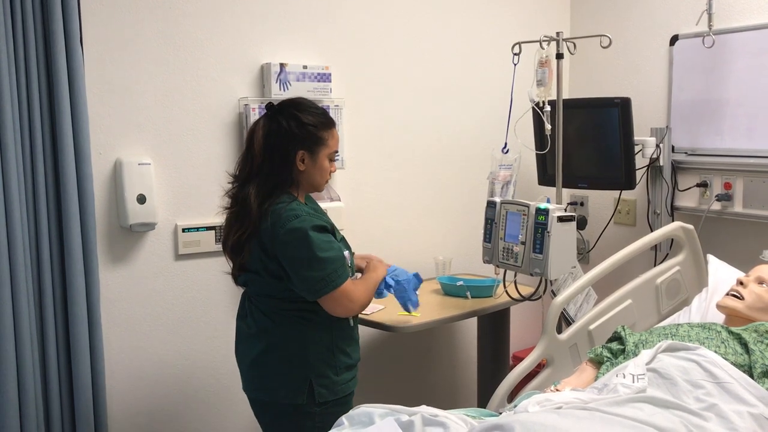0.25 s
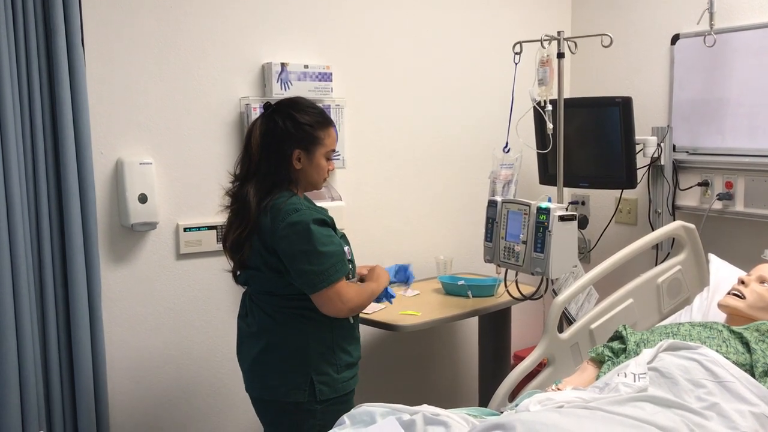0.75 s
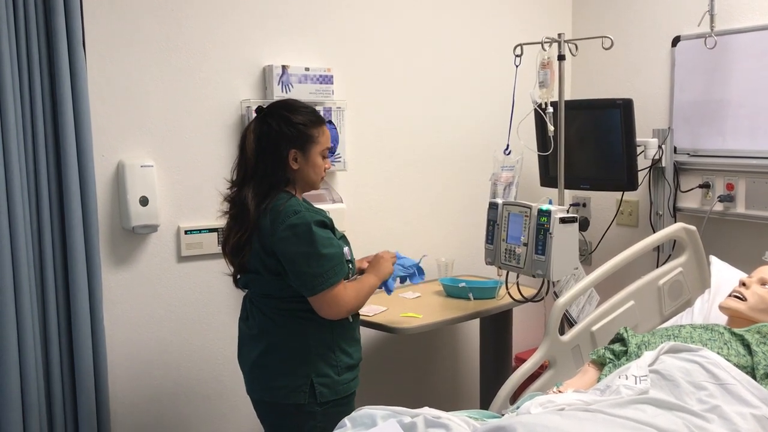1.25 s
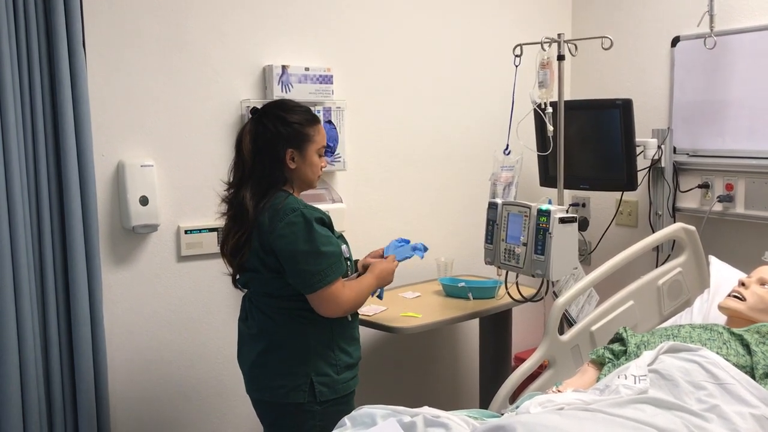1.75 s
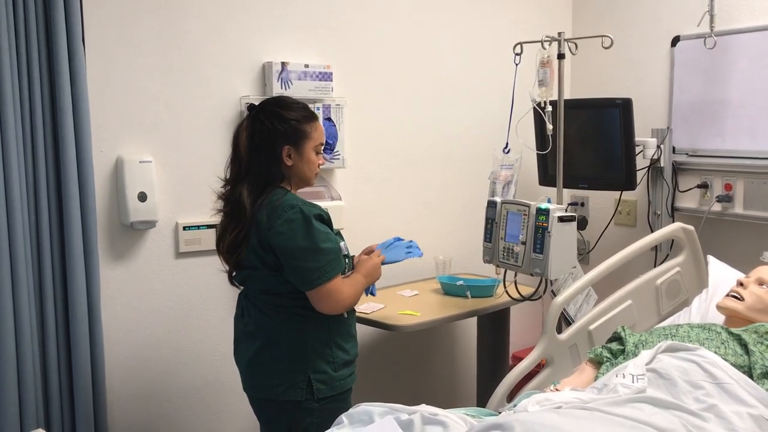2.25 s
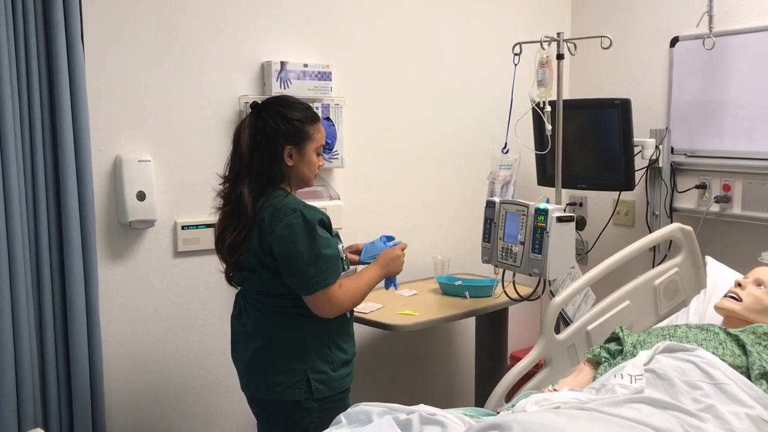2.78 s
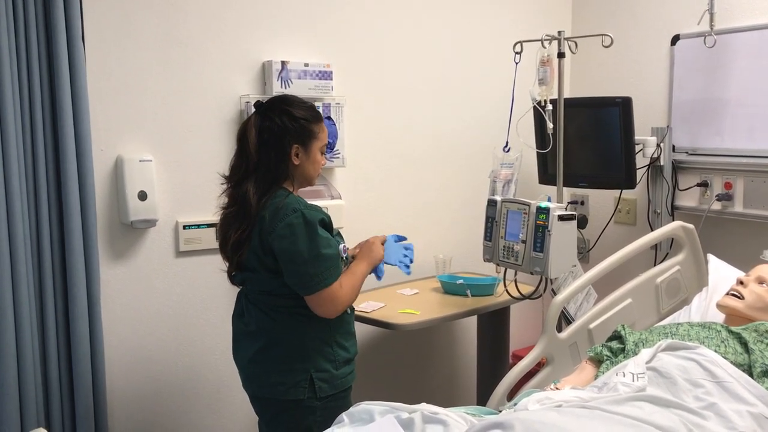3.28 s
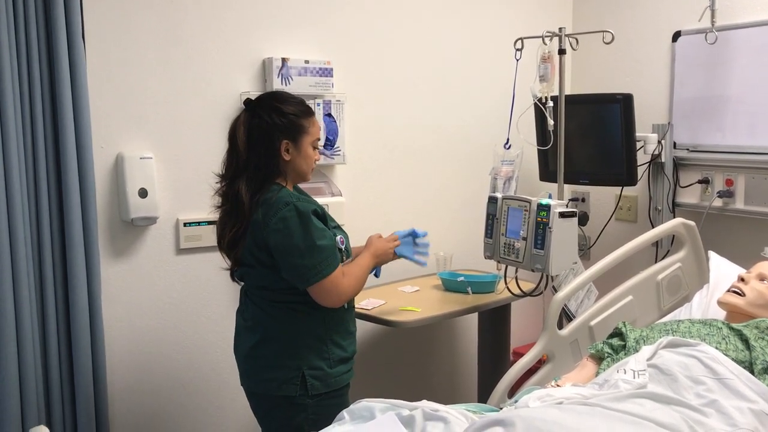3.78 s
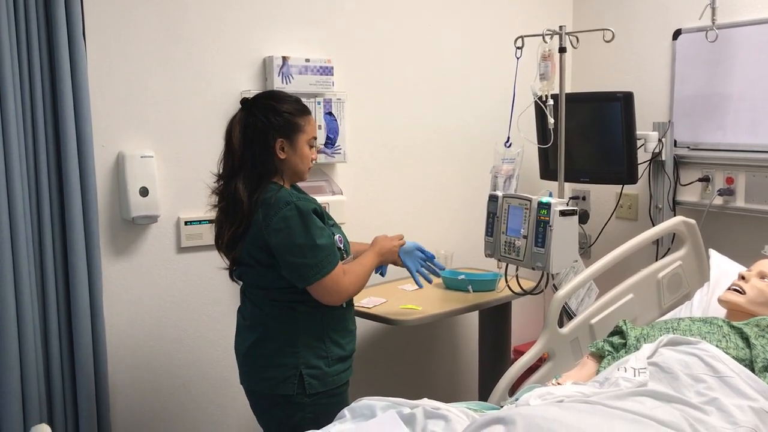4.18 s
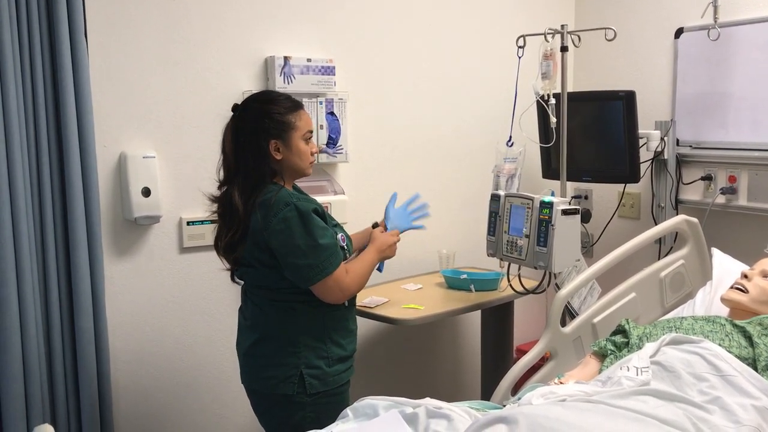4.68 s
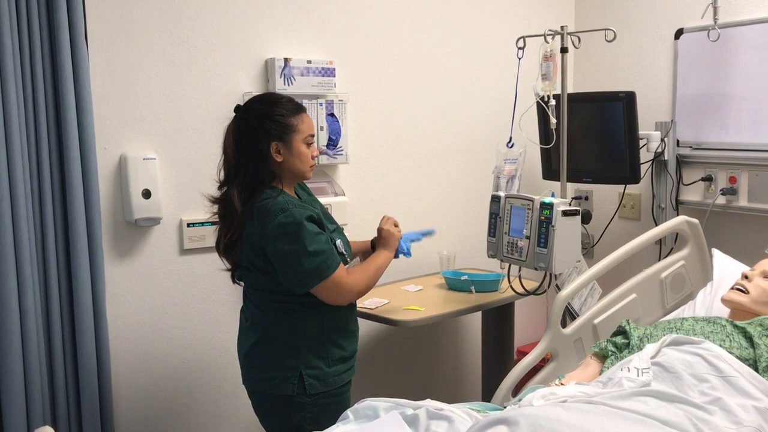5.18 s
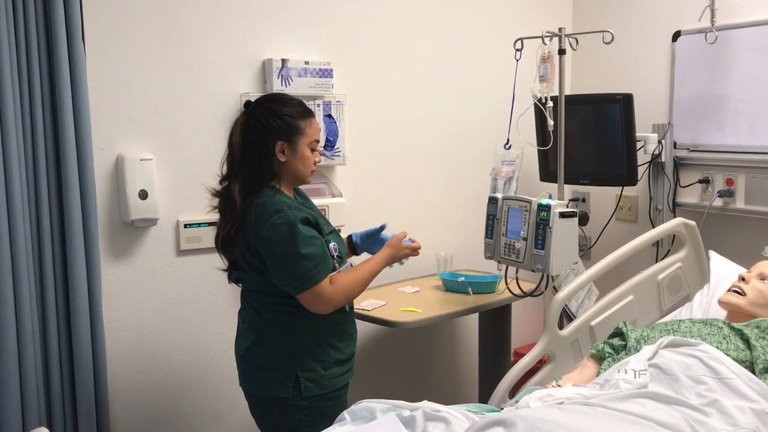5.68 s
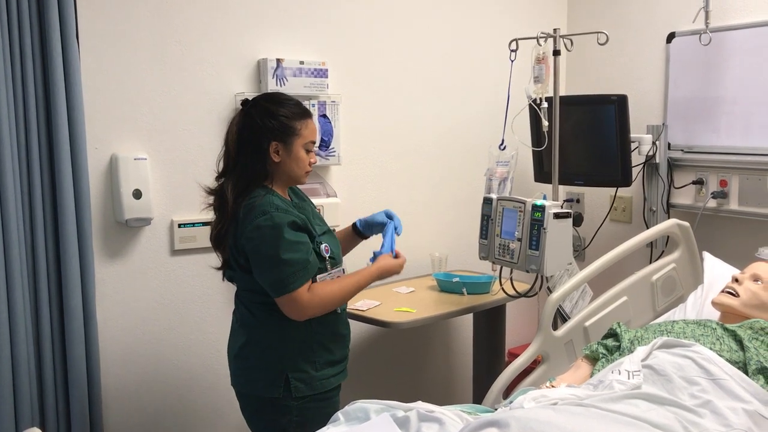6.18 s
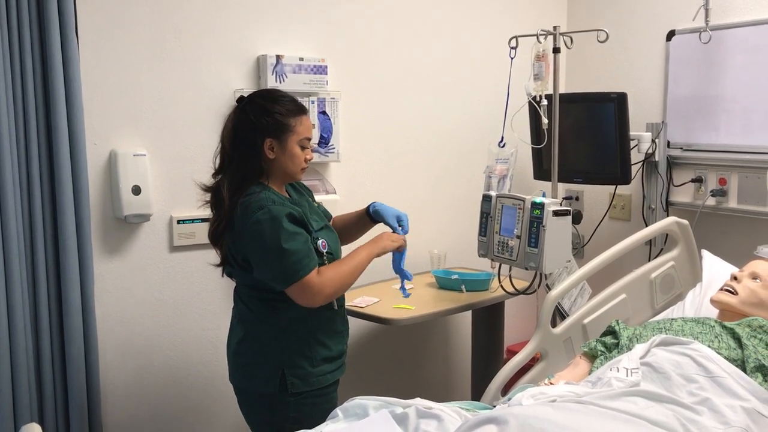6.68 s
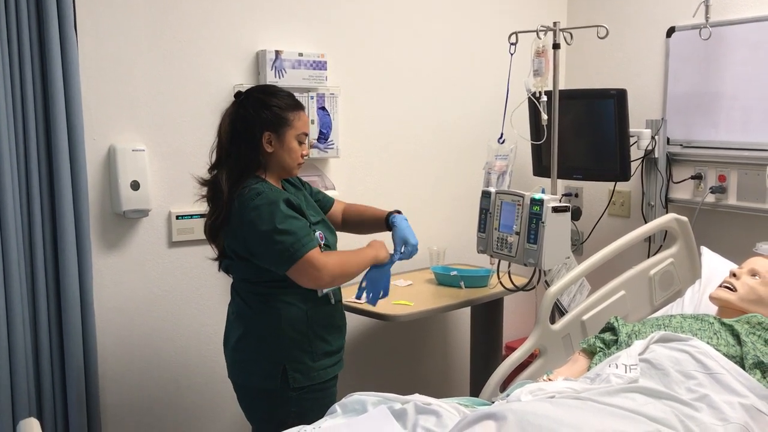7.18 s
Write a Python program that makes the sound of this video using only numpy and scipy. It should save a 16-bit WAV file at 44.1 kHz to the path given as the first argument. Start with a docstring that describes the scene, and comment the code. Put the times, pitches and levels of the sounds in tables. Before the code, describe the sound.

In a small humming room, stretchy gloves are handled with faint crinkles and flicks, then the cuff snaps twice against the wrist.

```python
"""Rubber gloves pulled on

Thin gloves are pulled on a few steps away in a small room: random tiny clicks, filtered, make the film slide,
crumple and rub; short noise cracks with decaying tones make folds flick open; trains of tones make it drag over
skin. Twice the cuff is let go and snaps against the wrist, built from a few quick contacts, a noisy flutter and
short fading tones. Ventilation hums underneath as tones and filtered noise."""
import sys
import numpy as np
from scipy import signal
from scipy.fft import rfft, irfft, next_fast_len
from scipy.io import wavfile
from scipy.ndimage import map_coordinates

SR = 44100
rng = np.random.default_rng(int(sys.argv[2]) if len(sys.argv) > 2 else 0)


def digitize_waveform(pressure):
    """Quantize a signal to 16-bit integers and store it at the path in sys.argv[1].

    Rows of a 2-D input are taken as channels; values are limited to [-1, 1].
    """
    field = np.atleast_2d(pressure).T
    bounded = np.clip(field, -1, 1)
    quanta = np.round(bounded * 32767).astype(np.int16)
    wavfile.write(sys.argv[1], SR, quanta)


N = 328444
T = np.arange(N) / SR  # time in seconds

# Strokes of the fingers over the film.
# Each row: start in seconds, length in seconds, sliding level in dB, crumpling level in dB.
FINGER_STROKES = [(0.103, .17, -78, -76), (0.397, 0.18, -74, -73.5), (0.617, 0.089, -73.5, -75),
                  (.69, 0.27, -72.5, -71.5), (0.955, 0.071, -78, -83), (1.189, 0.087, -68.5, -74.5),
                  (1.41, 0.15, -74, -74), (1.537, .14, -70, -70.5), (1.68, 0.18, -80, -76),
                  (1.874, .22, -75, -76), (2.163, 0.32, -74, -69), (2.464, 0.12, -74, -71),
                  (2.57, 0.2, -69, -72), (2.808, 0.16, -70, -71.5), (3.05, 0.2, -74, -74.5),
                  (3.231, 0.075, -78, -70), (3.423, 0.099, -80, -72.5), (3.573, 0.22, -68, -70.5),
                  (3.749, 0.25, -68, -67), (3.965, 0.39, -74, -69.5), (4.31, 0.27, -64.5, -65),
                  (4.568, 0.11, -64.5, -60.5), (4.65, .16, -72.5, -69), (4.786, .15, -69.5, -66),
                  (4.929, 0.088, -65, -70), (5.106, .15, -70.5, -78), (5.326, 0.28, -67, -68.5),
                  (5.554, .15, -78, -75), (5.73, 0.19, -74, -77.5), (5.888, 0.17, -75.5, -80),
                  (6.094, .19, -67.5, -72.5), (6.318, 0.097, -72.5, -82), (6.426, 0.079, -75, -78),
                  (6.662, .09, -70.5, -89), (6.76, 0.37, -79.5, -89), (7.117, 0.058, -75, -80),
                  (7.23, 0.12, -77, -81), (7.37, 0.074, -69, -85)]
WALL_S, WALL_DB = .0085, -11.5  # echo from the near wall: delay in seconds, level against the direct sound


def rustle():
    """Taut film rubs low; with each stroke loose film crumples in the middle and sliding film hisses."""
    # How loud the low rub of taut film is, greatest while the glove is worked over the hand.
    # Each row: time in seconds, level in dB.
    tautness = [(0, -72), (1.1, -76), (2.7, -71.5), (3.3, -78), (3.9, -69.5), (4.23, -72.5), (4.33, -60.5),
                (4.46, -72), (4.6, -59), (4.74, -74.5), (4.85, -67), (5.27, -75), (5.48, -69), (6.3, -78),
                (7, -76.5), (7.3, -71)]
    # Tone colour of the taut film's rub. Each row: frequency in Hz, level in dB per Hz.
    stretch_colour = [(200, -27), (450, -11.5), (700, 0), (1000, 1.5), (1500, -4.5), (2200, -8.5),
                      (5000, -19.5)]
    # Tone colour of crumpling film. Each row: frequency in Hz, level in dB per Hz.
    crumple_colour = [(700, -27.5), (1600, -0.5), (2400, -.5), (3800, 0.5), (5000, -6.5), (9000, -22.5)]
    # Tone colour of sliding film. Each row: frequency in Hz, level in dB per Hz.
    slide_colour = [(2000, -25), (4200, -8.5), (5800, 1), (7000, -2), (9400, -2), (10400, -9.5),
                    (12800, -3), (16000, -7)]
    idle_slide_db, idle_crumple_db = -81, -81.5  # the film never quite rests between strokes
    fidget_db, fidget_per_s = 0.5, 11  # how far and how fast that light handling wanders

    fidget = fidget_db * wobble(fidget_per_s)
    slide_power = amp(idle_slide_db + fidget) ** 2
    crumple_power = amp(idle_crumple_db + fidget) ** 2
    for start, length, slide_db, crumple_db in FINGER_STROKES:
        gain = stroke_gain(length)
        add(slide_power, start, (amp(slide_db) * gain) ** 2)
        add(crumple_power, start, (amp(crumple_db) * gain) ** 2)

    stretch_level = amp(np.interp(T, *np.transpose(tautness)))
    stretch = stretch_level * crinkle(stretch_colour, rate=900, spread_db=0)
    crumple = np.sqrt(crumple_power) * crinkle(crumple_colour, rate=900, spread_db=6.5)
    slide = np.sqrt(slide_power) * crinkle(slide_colour, rate=3000, spread_db=2.5)
    return stretch + crumple + slide


def stroke_gain(length):
    """A stroke speeds up, holds if there is time left, and slows down."""
    attack_share, release_share = 0.32, 0.63  # parts of the stroke spent speeding up and slowing down
    u = np.linspace(0, 1, int(length * SR))
    ramp = np.minimum(u / attack_share, (1 - u) / release_share)
    return np.sin(np.pi / 2 * np.clip(ramp, 0, 1))


def crinkle(spectrum, rate, spread_db):
    """Countless tiny slips and buckles of uneven size, rate a second, heard through the room, rms 1."""
    unevenness = amp(spread_db * np.clip(rng.standard_normal(N), -2, 2))
    sizes = rng.standard_normal(N) * unevenness
    happens = rng.random(N) < rate / SR
    return unit(room(colour(sizes * happens, spectrum), wet_db=1.5))


def cuff(flutter_t60=0.036):
    """The stretched cuff whips onto the wrist in a quick, uneven roll of contacts and flutters to rest."""
    # The cuff let go. Each row: time in seconds, level in dB, contacts a second as it rolls round the wrist,
    # about which contact hits hardest (counting from 1), flutter level in dB against the roll.
    snaps = [(4.2408, -20, 1770, 0.55, -8), (5.004, -18.5, 938, 2.1, -1)]
    # Tone colour, one list for each snap. Each row: frequency in Hz, level in dB per Hz.
    slap_colours = [
        [(120, -18), (350, -8.5), (600, -10.5), (1000, -2.5), (1450, -3), (2100, -2.5), (2600, -3.5), (3600, 1),
         (4800, -2), (7000, 2), (8700, 2), (10500, -6.5), (13000, -3.5), (16000, -10)],
        [(120, -21), (400, -12), (620, 0), (1000, -2.5), (1350, 2.5), (2200, .5), (3400, -2), (4700, -4),
         (5700, 8), (6800, 4), (8500, 2), (10500, 2.5), (13000, 1), (16000, -5)],
    ]
    # Colour the walls give a snap's tail. Each row: frequency in Hz, level in dB.
    wall_colour = [(500, 1), (1500, 0.5), (4000, -1), (8000, -.5), (12000, -1.5), (16000, -2)]
    direct_db, tail_db = -6.5, -6  # against the level of each snap
    smear = .0012  # seconds

    out, t = np.zeros(N), np.arange(SR // 2) / SR
    k = np.arange(5)[:, None]  # five contacts in a roll
    hz = np.fft.rfftfreq(len(t), 1 / SR)
    # the film is dispersive: the treble of each contact arrives first, the bass a millisecond later
    contact = np.exp(-2j * np.pi * smear * hz * (1 - hz / SR))
    for (s, db, rate, hardest, flutter_db), spectrum in zip(snaps, slap_colours):
        delays = (k + rng.uniform(0, .25, k.shape)) / rate
        contacts = (k + 1) * np.exp(-k / hardest - 2j * np.pi * hz * delays)
        roll = irfft(contact * np.sum(contacts, axis=0))
        flutter = rng.standard_normal(len(t)) * fade(t, flutter_t60)
        slap = blow(colour(blow(roll) + amp(flutter_db) * blow(flutter), spectrum))
        tail = blow(colour(colour(reverberation(), wall_colour), spectrum))
        add(out, s, amp(db + direct_db) * slap)
        add(out, s + WALL_S, amp(db + direct_db + WALL_DB) * slap)
        add(out, s, amp(db + tail_db) * tail)
    return out


def flicks():
    """A fold gives way with a crack and rings the patch of film around it for a few cycles."""
    # Folds flicking open. Each row: time in seconds, crack level in dB before a lift of 0.5 dB,
    # ring pitch in Hz, ring level in dB against the crack before a cut of 7 dB,
    # time in seconds for the crack's noise to fade by 60 dB.
    large_folds = [(.129, -49, 5560, 2, 0.027), (.3856, -46, 2570, 7, 0.033), (1.206, -59.5, 3050, 5, .03),
                   (1.355, -60, 2500, -10, .0025), (1.437, -62, 2280, 9, 0.0043),
                   (1.72, -65, 2450, 10, .003), (1.899, -56, 2200, 7, .003), (2.2723, -56, 2580, 6.5, .003),
                   (2.302, -55, 2490, 7, .003), (2.334, -52, 2930, 5, .002),
                   (2.557, -49.5, 1700, 1.5, .008), (2.563, -46, 6070, -6, 0.017),
                   (2.7046, -45, 6400, -2, 0.0063), (2.7085, -46.5, 6100, 2, .003),
                   (3.423, -62, 3670, 10, 0.0027), (3.6776, -58.5, 3350, 9, .003),
                   (3.8019, -51.5, 2630, 9.5, .005), (3.886, -55, 3550, 8, 0.0043),
                   (4.325, -54, 1200, 14, 0.0032), (4.392, -52, 2900, 5, .012),
                   (4.578, -50, 1830, -8, 0.0077), (4.612, -45, 2480, -14, 0.0085),
                   (4.957, -44, 3600, -14, 0.0074), (5.3066, -53.5, 4170, 1, 0.0043),
                   (5.3593, -56, 3670, 4, 0.0062), (5.416, -49, 3300, -4, 0.0044),
                   (5.4232, -44.5, 3570, 8.5, 0.0027), (5.4805, -47, 3420, 5, 0.0026),
                   (5.4964, -47, 3400, -1, 0.0039), (5.741, -55, 2370, -6, 0.0055),
                   (7.1315, -54.5, 3140, -6, 0.0061)]
    # Tone colour of a crack. Each row: frequency in Hz, level in dB per Hz.
    crack_colour = [(150, -15), (500, 0.5), (2000, -1.5), (6000, -1.5), (9000, -3.5), (11000, -9.5),
                    (16000, -13.5)]
    lift_db, ring_cut_db = 0.5, 7.0
    cycles = 7  # the ring's decay takes this many cycles to fall 60 dB

    out, t = np.zeros(N), np.arange(SR // 20) / SR
    for s, db, hz, ring_db, length in [*large_folds, *small_folds()]:
        crack = blow(colour(rng.standard_normal(len(t)) * fade(t, length), crack_colour))
        ring = blow(t * np.sin(2 * np.pi * hz * t) * fade(t, cycles / hz))
        flick = crack + amp(ring_db - ring_cut_db) * ring
        with_space = np.pad(flick, (0, SR // 5))  # silence for the room to ring on in
        add(out, s, amp(db + lift_db) * room(with_space, wet_db=-1.5))
    return out


def small_folds(scatter=0.27, spread_db=2.5):
    """Faint flicks fall at random within each stroke and follow the level of its crumpling."""
    # the same quantities as in the rows of large folds
    per_s, crack_db, middle_hz = 11, 4.5, 2840  # flicks a second, level against the crumpling, ring pitch
    ring_db, crack_s = 2, .004
    rows = []
    for start, length, _, crumple_db in FINGER_STROKES:
        chances = np.transpose([rng.random(8), rng.standard_normal(8), rng.standard_normal(8)])
        for u, size, detune in chances[:int(per_s * length)]:
            db = crumple_db + crack_db + spread_db * size
            hz = middle_hz * np.exp(scatter * detune)
            rows.append((start + u * length, db, hz, ring_db, crack_s))
    return rows


def drags(slip_rate=450, scatter=0.13, cycles=18):
    """Each slip rings the film, whose pitch glides as the tension changes, and scrapes out a little hiss."""
    # Rubber dragging over skin in quick slips; the row at 0.385 s is the glove flapping instead. Each row:
    # start in seconds, length in seconds, first pitch # in Hz, last pitch in Hz, level in dB before a cut of
    # 1.5 dB, hiss level in dB against the creak.
    skin_drags = [(0.196, 0.033, 1700, 1500, -67, -5), (0.385, 0.024, 1200, 700, -63, -7),
                  (1.903, 0.024, 2330, 2600, -68, 1), (2.795, 0.021, 1130, 1056, -63.5, -7.5),
                  (3.795, .12, 2540, 4050, -64, -15), (4.021, 0.05, 1240, 1380, -61, -7),
                  (4.077, 0.097, 1400, 1100, -62.5, -8), (4.315, 0.16, 1070, 970, -62, -4),
                  (4.802, .062, 807, 955, -60.5, -11), (4.959, 0.026, 1020, 1280, -65.5, 4),
                  (5.185, .03, 900, 1110, -67, -5), (5.359, 0.082, 3700, 2230, -59.5, -15),
                  (5.365, 0.081, 1140, 1450, -60, -10), (5.453, .055, 3600, 3380, -67, 4.5)]
    # Tone colour of the hiss. Each row: frequency in Hz, level in dB per Hz.
    scrape_colour = [(500, -22), (1500, 7), (3800, 8), (5000, -3), (7500, -5), (11000, -15), (16000, -10)]
    cut_db = 1.5

    out, t = np.zeros(N), np.arange(SR // 40) / SR
    for s, length, first_hz, last_hz, db, hiss_db in skin_drags:
        creak, scrape = np.zeros((2, SR // 2))
        slips = np.transpose([rng.random(96), rng.standard_normal(96), rng.rayleigh(size=96)])
        for u, detune, size in slips[:max(int(slip_rate * length), 2)]:
            hz = (first_hz + u * (last_hz - first_hz)) * np.exp(scatter * detune)
            force = size * np.sqrt(np.sin(np.pi * u))  # strongest halfway through the drag
            add(creak, u * length, force * np.sin(2 * np.pi * hz * t) * fade(t, cycles / hz))
            add(scrape, u * length, force * fade(t, 0.0052))
        hiss = colour(scrape * rng.standard_normal(len(scrape)), scrape_colour)
        drag = unit(creak) + amp(hiss_db) * unit(hiss)
        # the level holds over the drag's own length, not over the whole half second
        length_gain = np.sqrt(length * SR / len(drag))
        add(out, s, amp(db - cut_db) * length_gain * room(drag, wet_db=-1))
    return out


def pops():
    """Each cuff snap carries a short hollow note in its body."""
    # Hollow notes under the cuff snaps. # Each row: time in seconds, pitch in Hz, level in dB, time in seconds
    # to fade by 60 dB.
    snap_notes = [(4.2455, 1460, -37.5, 0.029), (5.005, 705, -34, 0.022), (5.004, 1330, -35.5, 0.027)]
    out, t = np.zeros(N), np.arange(SR // 3) / SR
    for s, hz, db, t60 in snap_notes:
        note = np.sin(2 * np.pi * hz * t) * fade(t, t60)
        add(out, s, amp(db) * room(note, wet_db=-3.0))
    return out


def ventilation():
    """Fan and motor tones waver slowly over duct rumble and soft air noise."""
    # Fan and motor tones. Each row: frequency in Hz, rms level in dB, size of the level's wavering in dB.
    fan_tones = [(59.05, -55, 1.5), (72.92, -41.5, .4), (108.5, -65, 2), (120, -71, 1), (145.84, -54.5, 1),
                 (218.76, -70, 1.5), (291.6, -80, 2), (364.6, -85, 2)]
    # Tone colour of the duct rumble. Each row: frequency in Hz, level in dB per Hz.
    rumble_colour = [(15, -31.5), (27, -23), (42, 0.5), (75, 5.5), (94, -1), (106, 5), (140, 5),
                     (163, -6.5), (188, 4.5), (208, -8), (234, 0), (270, -6), (330, -12.5), (600, -44)]
    # Tone colour of the air noise. Each row: frequency in Hz, level in dB per Hz.
    air_colour = [(150, 0.5), (400, 7), (600, 1.5), (900, 3), (1250, -4.5), (1550, -2.5), (1850, -12),
                  (2300, -4.5), (2800, -13), (6000, -12), (9000, -19.5), (10500, -27), (13000, -22),
                  (16000, -24)]
    hum = np.zeros(N)
    for hz, db, waver_db in fan_tones:
        level = np.sqrt(2) * amp(db + waver_db * wobble(3.237))  # root 2 turns rms into peak
        hum += level * np.sin(2 * np.pi * (hz * T + rng.random()))
    rumble = amp(-55) * unit(colour(rng.standard_normal(N), rumble_colour))
    air = amp(-71.0) * unit(colour(rng.standard_normal(N), air_colour))
    return hum + rumble + air


def room(x, wet_db):
    """Direct sound, one echo from the near wall and a diffuse tail; the response has unit energy."""
    response = amp(wet_db) * reverberation()
    response[0] += 1  # the direct sound
    add(response, WALL_S + rng.uniform(-.001, .001), amp([WALL_DB]))
    return signal.fftconvolve(x, response / np.linalg.norm(response))[:len(x)]


def reverberation():
    """A diffuse tail of unit energy; the treble dies first."""
    # How long the room rings. Each row: frequency in Hz, time in seconds to fade by 60 dB.
    ring_times = [(200, 0.36), (1000, 0.23), (6000, 0.23), (10000, 0.2), (16000, 0.12)]
    hz, t, z = signal.stft(rng.standard_normal(SR // 2), SR, nperseg=256)
    faded = z * fade(t, along(ring_times, hz)[:, None])
    tail = signal.istft(faded, SR, nperseg=256)[1]
    return tail / np.linalg.norm(tail)


def colour(x, spectrum):
    """Filter with the given spectrum that never sounds ahead of its input (minimum phase)."""
    m = 2 * next_fast_len(min(len(x), SR // 2))
    cepstrum = irfft(np.log(amp(along(spectrum, np.fft.rfftfreq(m, 1 / SR)))))
    # folding the cepstrum onto positive times packs the response as early as it can be
    cepstrum[1:m // 2] *= 2
    cepstrum[m // 2 + 1:] = 0
    response = irfft(np.exp(rfft(cepstrum)))[:m // 2]
    return signal.oaconvolve(x, response)[:len(x)]


def along(points, hz):
    """(Hz, value) points read on a log frequency axis."""
    f, v = np.transpose(points)
    return np.interp(np.log(hz + 1), np.log(f + 1), v)


def fade(t, t60):
    """Exponential decay, 60 dB in t60 seconds."""
    return np.exp(-np.log(1000) * t / np.maximum(t60, 1e-4))


def wobble(rate):
    """A smooth random curve through rate random points a second."""
    return map_coordinates(rng.standard_normal(int(N * rate / SR) + 4), [T * rate])


def add(track, s, sound):
    """Mix a sound into the track at time s in seconds."""
    part = track[max(round(s * SR), 0):][:len(sound)]
    part += sound[:len(part)]


def amp(db):
    """Decibels to gain."""
    return 10 ** (np.asarray(db) / 20)


def unit(x):
    """Scale to rms 1."""
    return x / np.sqrt(np.mean(x ** 2) + 1e-20)


def blow(x):
    """Scale a short sound to the energy of one millisecond at rms 1."""
    return x / np.linalg.norm(x) * np.sqrt(SR / 1000)


def scene():
    """Gloves and ventilation mixed into one channel."""
    gloves = rustle() + cuff() + flicks() + drags() + pops()
    return (gloves + ventilation())[None]


def record(dry):
    """The treble is cut off steeply at the top of the band."""
    top_hz = 15900
    m = next_fast_len(N + SR // 2)
    passed = 1 / np.sqrt(1 + (np.fft.rfftfreq(m, 1 / SR) / top_hz) ** 200)
    return irfft(rfft(dry, m) * passed, m)[:, :N]


dry = scene()
out = record(dry)
digitize_waveform(out)
```